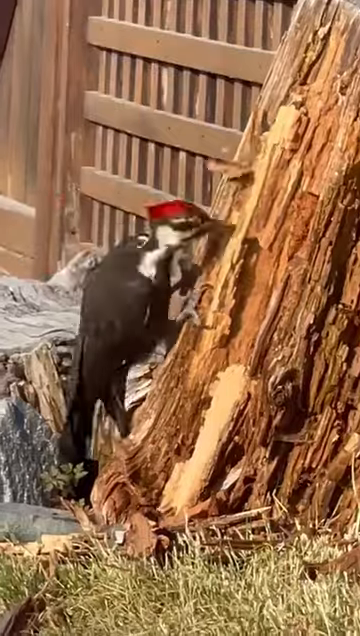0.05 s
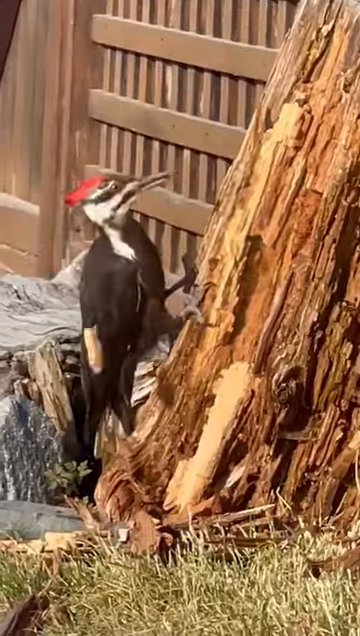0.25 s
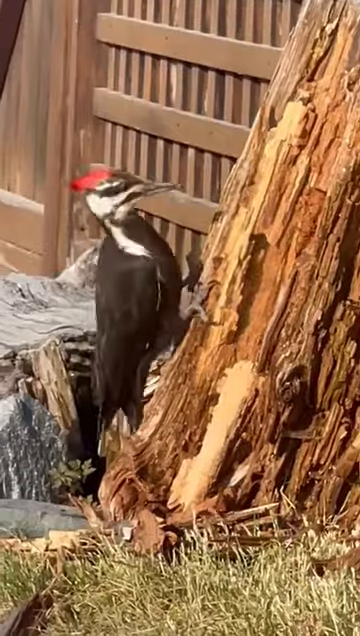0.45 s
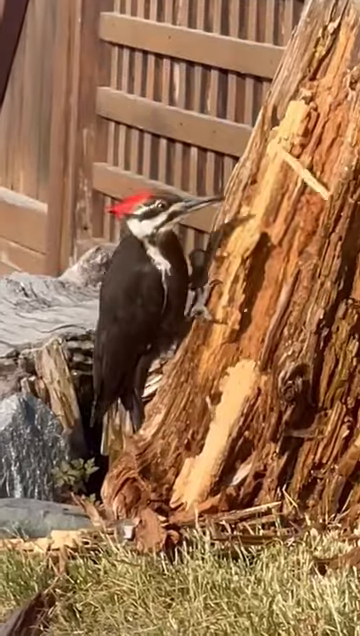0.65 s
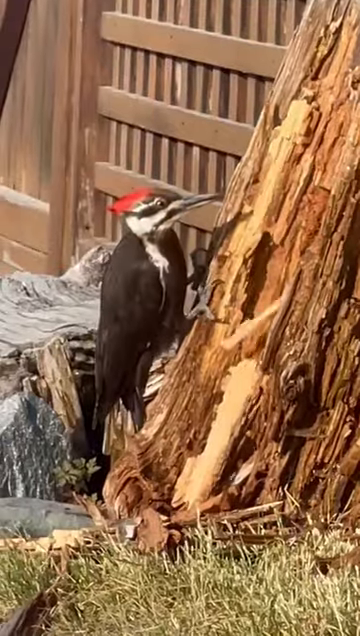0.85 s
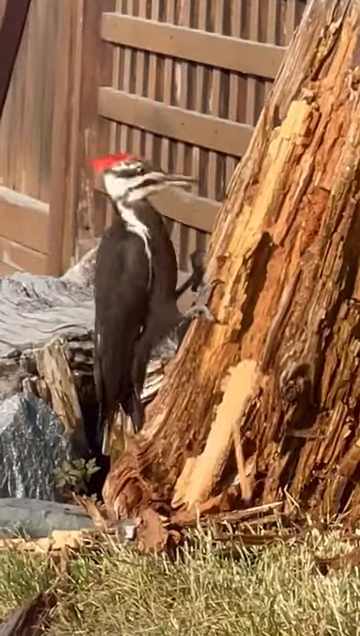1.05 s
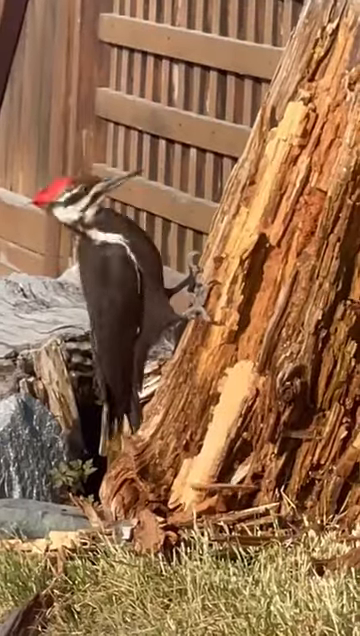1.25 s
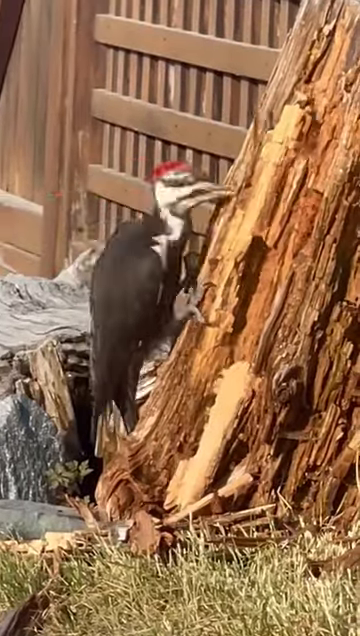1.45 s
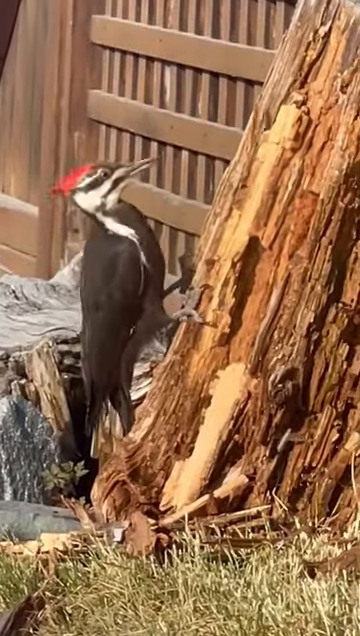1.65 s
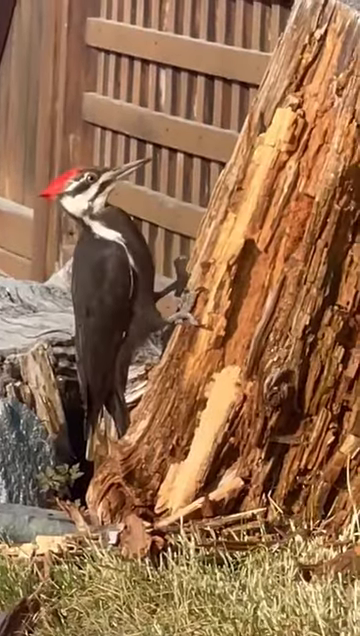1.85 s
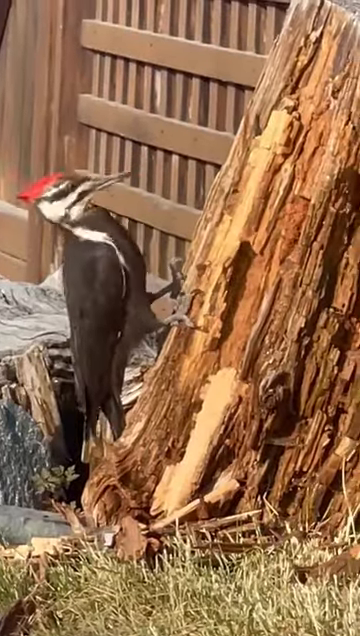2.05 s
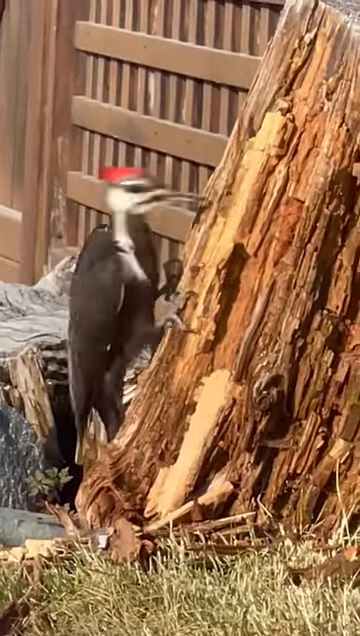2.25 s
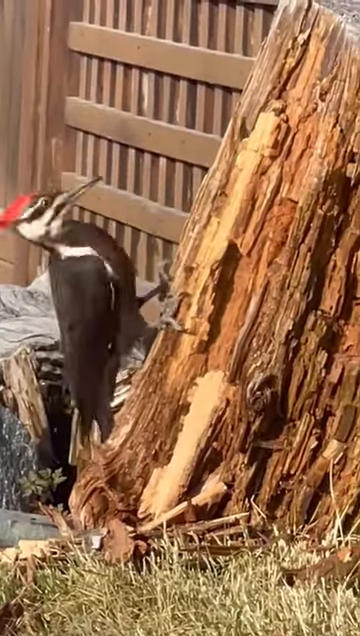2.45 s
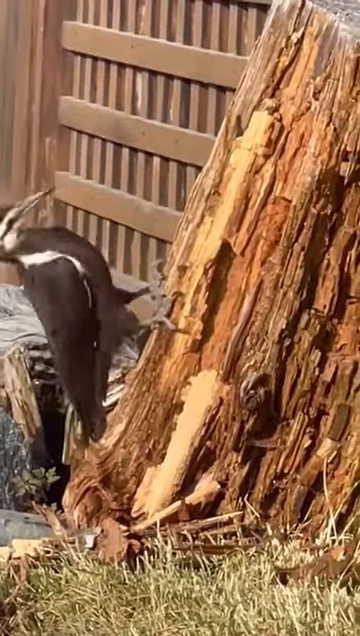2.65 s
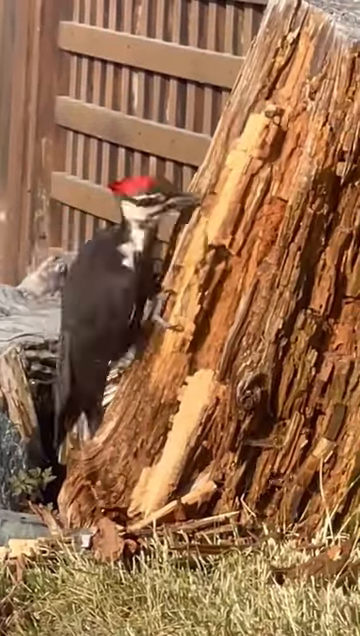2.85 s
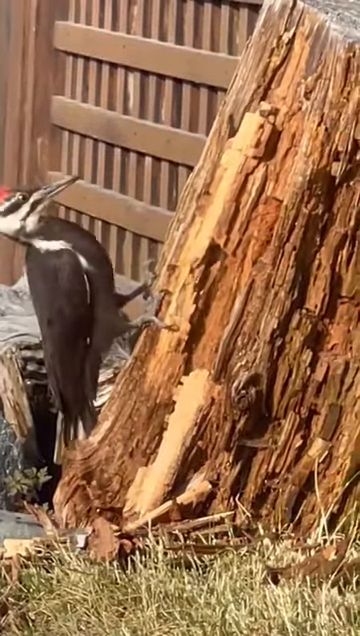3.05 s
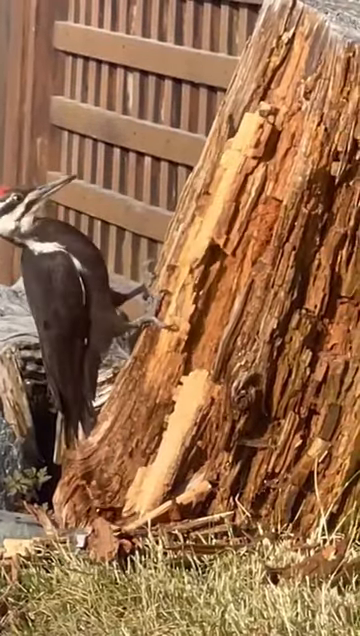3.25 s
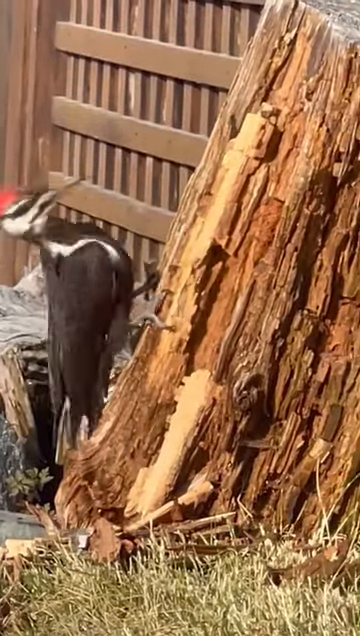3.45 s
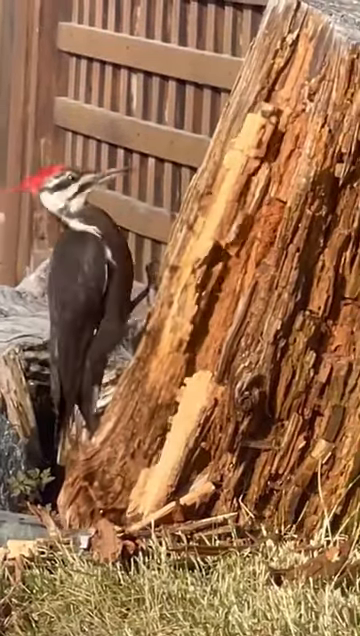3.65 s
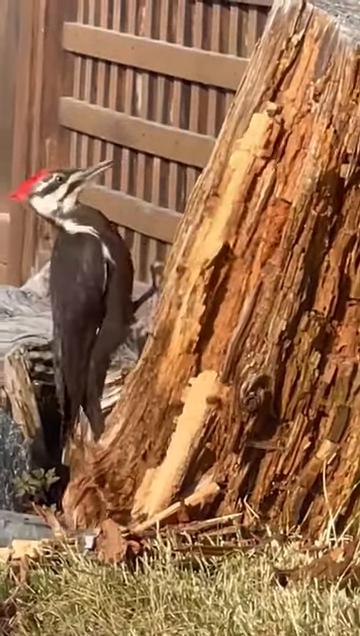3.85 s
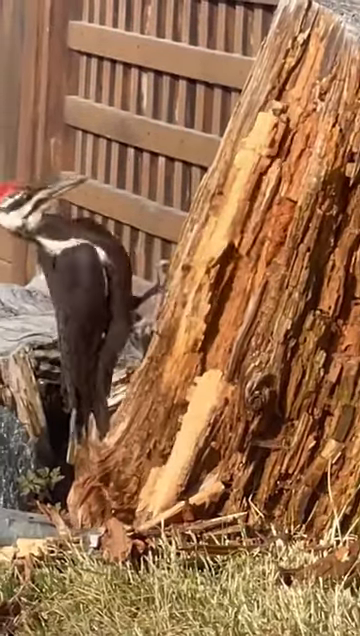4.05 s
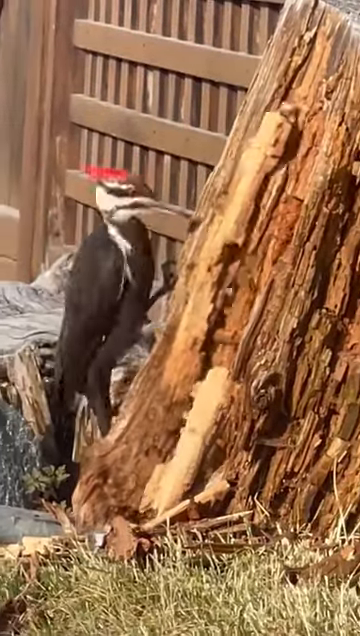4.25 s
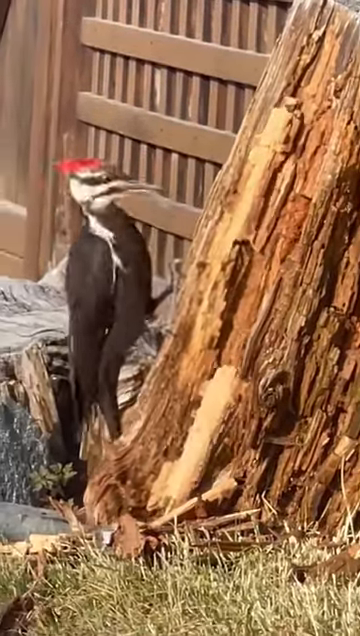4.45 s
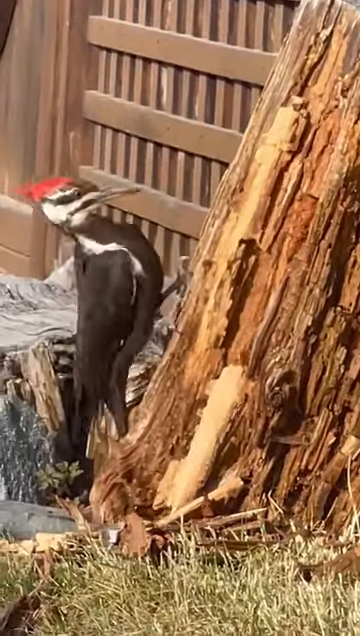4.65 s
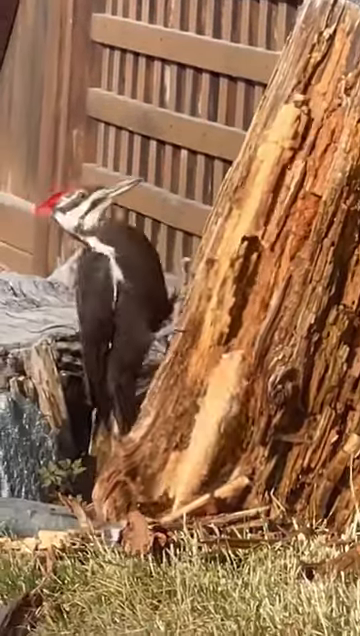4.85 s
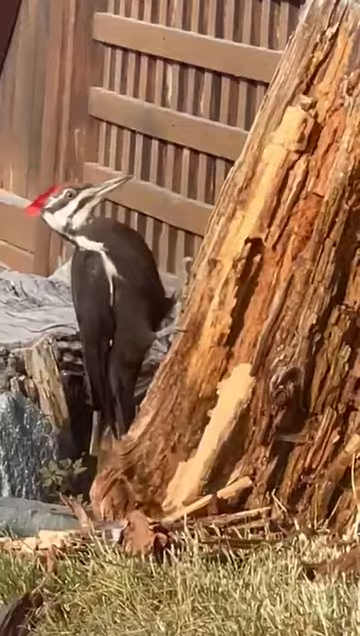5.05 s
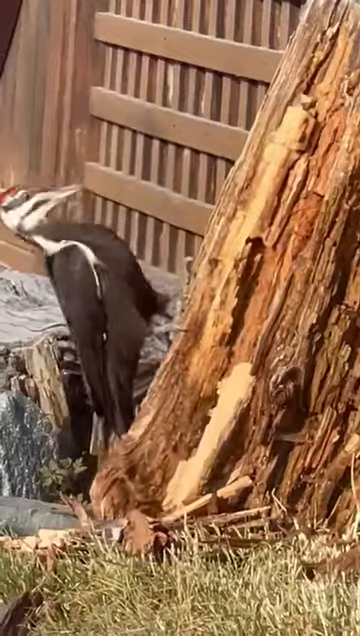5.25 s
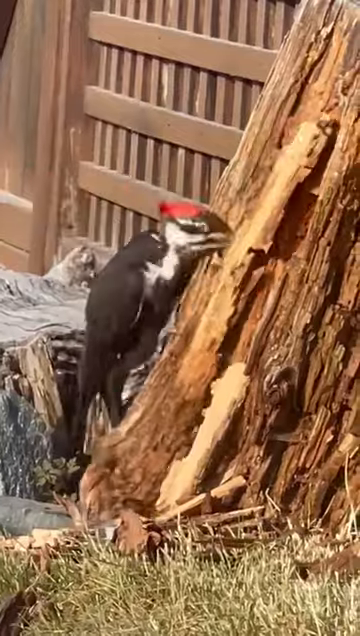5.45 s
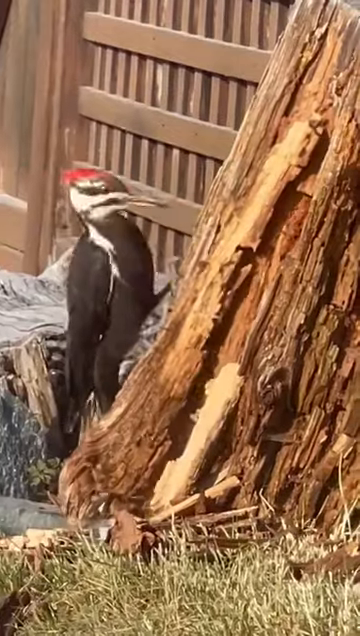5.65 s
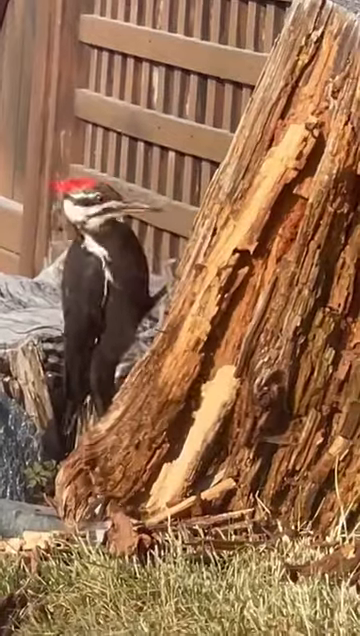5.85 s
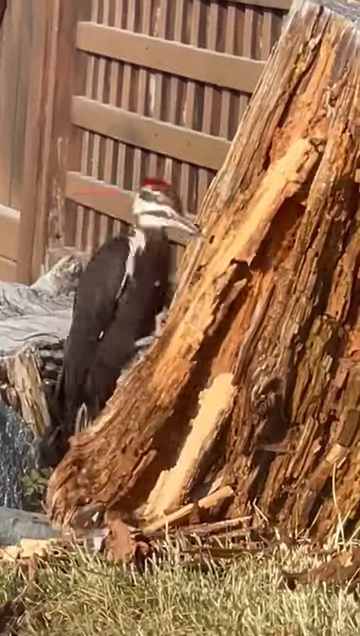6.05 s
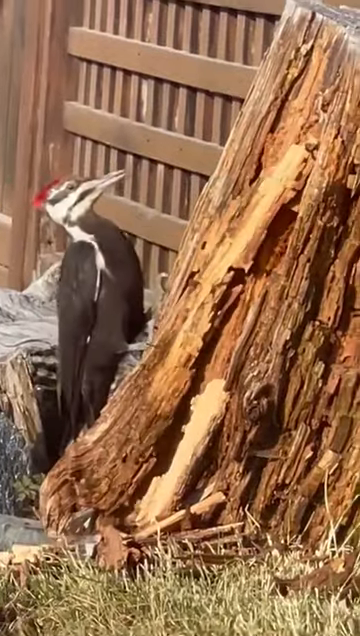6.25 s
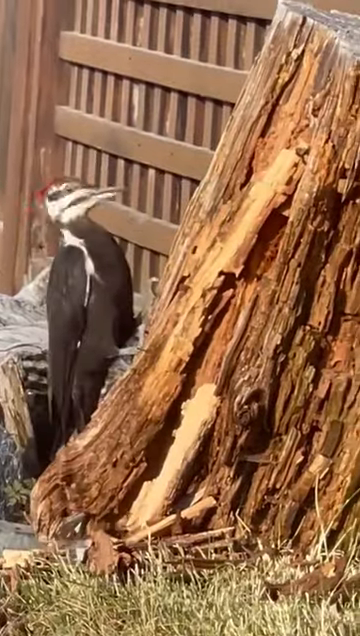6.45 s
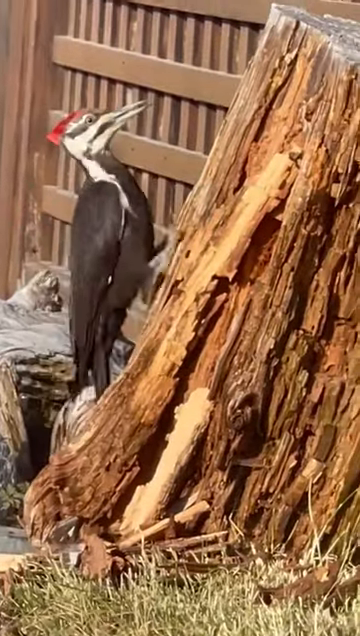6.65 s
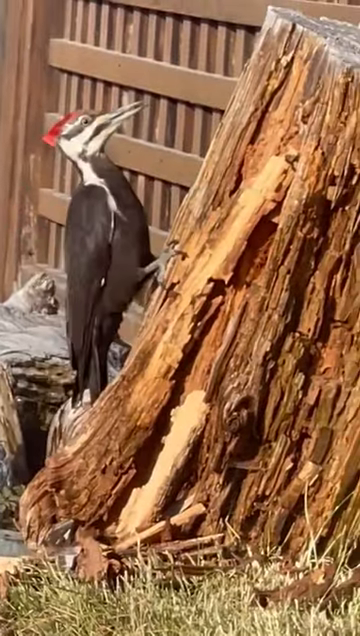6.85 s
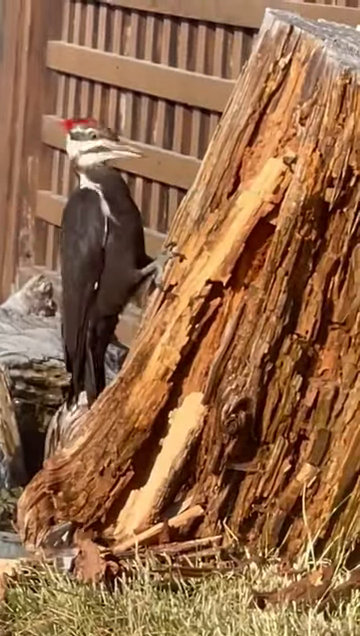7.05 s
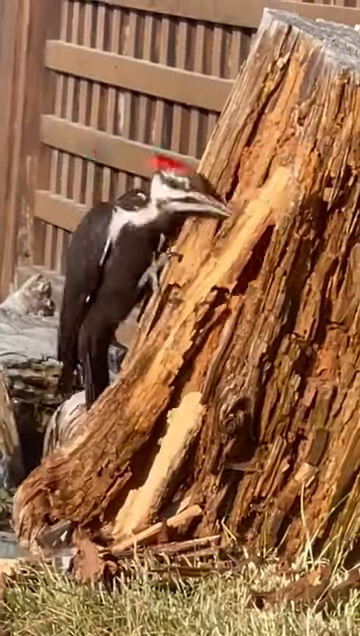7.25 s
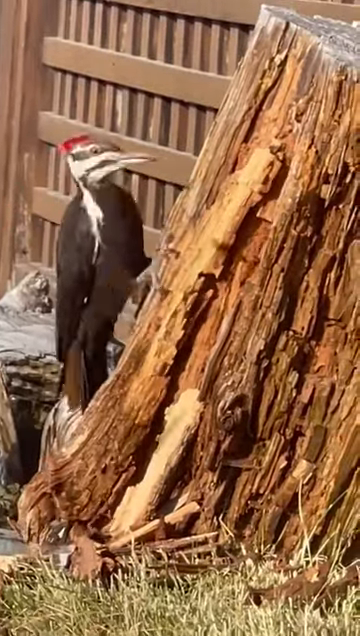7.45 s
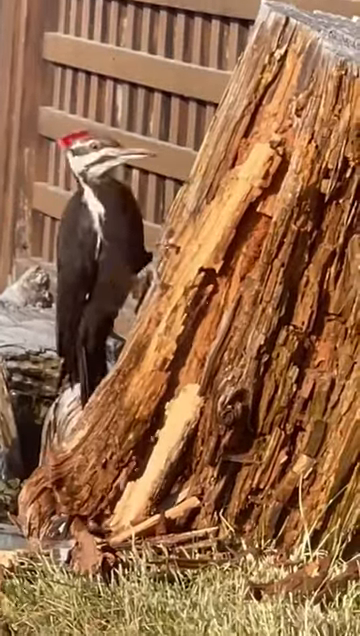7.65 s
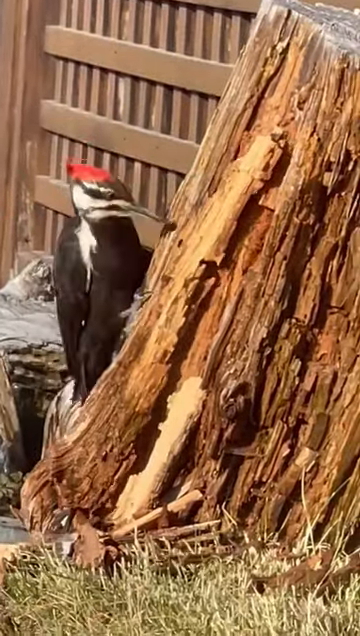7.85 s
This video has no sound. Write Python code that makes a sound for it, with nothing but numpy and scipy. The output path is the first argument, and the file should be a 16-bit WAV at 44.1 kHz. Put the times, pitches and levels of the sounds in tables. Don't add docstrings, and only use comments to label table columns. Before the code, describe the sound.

A large woodpecker chops a rotten stump with sharp, uneven single blows, hollow woody knocks, snapping splinters and falling chips in a quiet yard.

```python
import sys
import numpy as np
from scipy import signal
from scipy.fft import rfft, irfft, next_fast_len
from scipy.io import wavfile
from scipy.ndimage import uniform_filter1d

SR = 44100
rng = np.random.default_rng(int(sys.argv[2]) if len(sys.argv) > 2 else 0)


def master_out(mix):
    frames = np.transpose(np.atleast_2d(mix))
    ceiling = np.clip(frames, -1, 1)
    pcm = np.round(ceiling * 32767).astype(np.int16)
    wavfile.write(sys.argv[1], SR, pcm)


def ratio_of_db(decibels):
    return 10 ** (np.asarray(decibels, float) / 20)


N = 348831


def evened(x):
    return x / np.sqrt(np.mean(x ** 2) + 1e-20)


def read(points, hz):
    f, value = np.transpose(points)
    return np.interp(np.log(hz + 1), np.log(f + 1), value)


def shaped(x, spectrum, size):
    return irfft(rfft(x, size) * ratio_of_db(read(spectrum, np.fft.rfftfreq(size, 1 / SR))), size)


def coloured(spectrum, size):
    return evened(shaped(rng.standard_normal(size), spectrum, size))


def fade(t, rise, t60):
    return (1 - np.exp(-t / rise)) * ratio_of_db(-60 * t / t60)


def gritty(size, grain, spread_db):
    lumps = evened(uniform_filter1d(rng.standard_normal(size), grain))
    return ratio_of_db(spread_db * np.clip(lumps, -3, 2))


def add(mix, s, sound):
    part = mix[round(s * SR):][:len(sound)]
    part += sound[:len(part)]


# freq_hz, level_db
CRACK_SPECTRUM = [(300, -17), (1200, -22), (2300, -9.5), (3200, -4), (4000, 4), (6000, 2.5), (10000, 9),
                  (13000, -9.5)]


def crack(t, peak_db):
    burst = coloured(CRACK_SPECTRUM, len(t)) * fade(t, .0008, .0095)
    return ratio_of_db(peak_db) * burst / abs(burst).max()


def ring(modes, t, spread_db, cycles, scatter, factor, tilt_db):
    strands = 8
    hz, db, t60 = np.repeat(modes, strands, axis=0).T[:, :, None]
    detune, nudge, unevenness = rng.standard_normal((3, len(hz), 1))
    start = np.repeat(rng.uniform(0, 2 * np.pi, len(modes)), strands)[:, None] + .6 * nudge
    waves = np.sin(2 * np.pi * hz * factor * (1 + scatter * detune) * t + start)
    swell = (1 - np.exp(-t * hz / cycles)) ** 2 * ratio_of_db(-60 * t / t60)
    level = ratio_of_db(db + tilt_db * np.log2(hz / hz.mean()) + spread_db * unevenness)
    sound = (level * swell * waves).sum(0)
    return sound / np.sqrt(np.mean(sound[:1000] ** 2))


# pitch_hz, level_db, t60_s
BODY_MODES = [(59, -10.5, 0.3), (81.7, -14, 0.46), (111.6, -5, 0.16), (150, -7.5, 0.26), (203.9, -7, 0.26),
              (260.73, 7.5, .07), (320.8, -2, 0.074), (387.9, -5.5, 0.07)]


def hollow_body(t, level_db, factor, tilt_db):
    return ratio_of_db(level_db + 1.0) * ring(BODY_MODES, t, 2.2, 2.2, .035, factor, tilt_db)


# pitch_hz, level_db, t60_s
KNOCK_MODES = [(460.05, 2.5, 0.031), (606.5, 0.5, 0.04), (713.6, -4.5, 0.073), (1008.4, -3, 0.029),
               (1052.2, -7, 0.063), (1270, -6.5, 0.014), (1610, -4.5, .024), (1956, -8.5, 0.022),
               (2290, -7, 0.022), (2751, -16, 0.017)]


def knock(t, level_db, factor, tilt_db):
    wood = ratio_of_db(level_db - 1.5) * ring(KNOCK_MODES, t, 1, 3.2, .05, factor, tilt_db)
    return wood * gritty(len(t), 40, 3.5)


# freq_hz, level_db
TEAR_SPECTRUM = [(150, -1.5), (600, -1), (1500, -10), (3000, -8.5), (6000, -9.5), (13000, -9)]


def tearing_fibres(t, level_db):
    tear = coloured(TEAR_SPECTRUM, len(t)) * gritty(len(t), 60, 1.6) * fade(t, 0.0021, t60=0.18)
    tear *= np.exp(-(t / 0.061) ** 3)
    return ratio_of_db(level_db) * tear


def blow(crack_db, body_db, knock_db, tear_db, body_factor, body_tilt_db, knock_factor, knock_tilt_db):
    t = np.arange(16384) / SR
    bright = crack(t, crack_db)
    tear = tearing_fibres(t, tear_db)
    wood = hollow_body(t, body_db, body_factor, body_tilt_db)
    add(wood, 0, knock(t[:5000], knock_db, knock_factor, knock_tilt_db))
    return bright + wood + tear


# start_s, crack_peak_db, body_db, knock_db, tear_db
BEAK_BLOWS = [(0.1052, -11.5, -40.5, -33.5, -47.5), (0.5992, -24, -57, -54, -46),
              (1.5232, -20, -38, -41.5, -43.5), (2.356, -17, -39.5, -38, -41.5),
              (2.9088, -24.5, -38.5, -48.5, -34.5), (2.9252, -18, -54, -38.5, -52.5),
              (3.581, -26, -41, -48, -34.5), (4.2245, -28, -38.5, -46, -39.5),
              (4.7858, -22, -47.5, -48.5, -40.5), (5.5179, -27, -41.5, -48.5, -39.5),
              (6.0779, -35.5, -51.5, -57.5, -50), (6.097, -13.5, -47.5, -51, -50.5),
              (7.3448, -26, -57, -53.5, -38.5)]
LANDING_SPOTS = [(.98, .1, .97, -1), (1.002, -3.2, 1.001, 2.54), (1.04, 0.5, .97, -4.5),
                 (1.04, 0.5, 1.04, 3), (1.019, 0.5, 1.001, 1.18), (1.02, -0.7, 1.001, 2.5),
                 (1.04, 4, .99, -4.5), (1.001, 2.5, 1.001, -1), (1.001, 0, 1.001, 4.5),
                 (1.001, 2, 1.001, 1), (1.001, 1.47, 1.001, -0.41), (1.001, 0, 1.001, -1.54),
                 (1.001, 4.95, 1.05, 5.68)]


def blows(mix):
    for s, *settings in np.hstack([BEAK_BLOWS, LANDING_SPOTS]):
        add(mix, s, blow(*settings))


def tick(peak_db, hz, bright_db, wood_db, fall_db):
    t, t60 = np.arange(4096) / SR, 0.49 / max(fall_db, 3)
    shape = gritty(len(t), 30, 3.5) * fade(t, .06 * t60, t60)
    snap_spectrum = [(700, -30), (1200, -9), (hz, 0), (hz * 1.6, -8), (5000, -10), (6500, -35)]
    edge_spectrum = [(4000, -46.0), (5200, -8), (7200, -0.5), (10000, -1.5), (13000, -7.5)]
    wood_spectrum = [(200, -25), (400, 13.0), (1100, 7), (1600, -40)]
    snap = coloured(snap_spectrum, len(t)) * shape
    edge = coloured(edge_spectrum, len(t)) * shape
    woody = coloured(wood_spectrum, len(t)) * fade(t, 0.2 * t60, 1.4 * t60)
    sharp = (snap + ratio_of_db(bright_db + 6.0) * edge) / abs(snap).max()
    return ratio_of_db(peak_db) * (sharp + ratio_of_db(wood_db - 1.5) * woody)


# start_s, peak_db, ring_hz, bright_edge_db re peak
SPLINTER_SNAPS = [(0.6078, -32, 3920, 5), (0.6137, -38.5, 3740, 5.5), (0.6204, -52, 3320, -17),
                  (0.6491, -45.5, 2370, -22), (1.5314, -38.5, 3000, 0), (1.5732, -41.5, 1610, -1),
                  (1.5984, -45, 1630, -0.5), (1.6508, -49, 3010, 2), (2.3894, -43, 2300, 1.5),
                  (2.416, -43.5, 1265, 1.5), (2.4582, -49.5, 2942, -11), (2.6335, -56.5, 1800, -27.5),
                  (2.735, -67.5, 1590, -20.5), (3.7494, -65.5, 1217, 6.5), (3.7958, -51.5, 1950, -17.5),
                  (3.8244, -55, 4180, -12), (4.2354, -35, 2220, 4), (4.35, -57, 1580, -6.5),
                  (4.374, -40.5, 1540, -3.5), (4.5082, -52.5, 2400, -13.5), (4.8194, -55, 1860, 9.5),
                  (4.8552, -38, 2570, -5.5), (4.8668, -40.5, 1980, -11), (5.6592, -52, 2060, 0),
                  (6.1114, -34, 2755, -22.5), (7.3538, -35.5, 1896, -6.5), (7.3892, -53.5, 1900, 6),
                  (7.8600, -52, 3000, -3.5), (7.8743, -49.5, 2250, 2.5)]


def splinters(mix):
    for s, peak_db, hz, bright_db in SPLINTER_SNAPS:
        add(mix, s, tick(peak_db, hz, bright_db, wood_db=-6, fall_db=21))


# start_s, peak_db, ring_hz, bright_edge_db re peak
CHIP_SKIDS = [(0.4424, -56.5, 1690, -6), (0.6943, -57, 1650, -24.5), (0.8692, -56.5, 3350, -1.5),
              (2.087, -60.5, 1480, -2), (3.6782, -45, 1455, -3), (4.271, -42, 1990, 0),
              (4.433, -52.5, 3550, -22), (4.6124, -51.5, 1670, -46.5), (4.9326, -48.5, 1890, -2.5),
              (5.5834, -48.5, 2350, -4.5), (5.6401, -50, 2029, -1), (6.7052, -51, 1970, -14),
              (6.7534, -50, 2400, 1), (6.7631, -50, 1650, -0.4), (6.7962, -49.5, 2210, -8),
              (7.2472, -50.5, 2200, -6), (7.4784, -65.5, 1890, -0.25), (7.5633, -65.5, 1500, -12.5),
              (7.668, -65, 3470, -0.5), (0.7235, -69, 2576, -20.5), (0.884, -62, 3240, -17.5),
              (1.556, -49, 3675, -12), (3.6699, -53.5, 2000, -5.5), (3.9343, -67.5, 1794, 0.5),
              (4.4023, -56, 3220, -14), (4.7405, -55.5, 3020, -20.5), (5.7277, -62, 2927, -15.5),
              (6.384, -66, 1500, -31), (7.903, -52.5, 2800, -6)]


def chips(mix):
    for s, peak_db, hz, bright_db in CHIP_SKIDS:
        add(mix, s, tick(peak_db, hz, bright_db, wood_db=-8.5, fall_db=11))


# start_s, peak_db
CLAW_SCRATCHES = [(0.003, -73), (0.4164, -64), (0.4637, -71), (0.4964, -74.5), (0.969, -76), (1.0008, -70),
                  (2.553, -79), (4.1494, -72), (6.0965, -41), (6.696, -76), (6.742, -72), (7.117, -74),
                  (7.4126, -58), (7.6534, -70.5), (7.7914, -65), (7.8131, -67)]


def claws(mix):
    for s, peak_db in CLAW_SCRATCHES:
        add(mix, s, tick(peak_db, hz=2200, bright_db=12.5, wood_db=0.5, fall_db=37))


# start_s, peak_db
CRUMB_DROPS = [(1.0434, -67.5), (4.72, -72), (5.017, -66), (5.046, -65), (5.07, -67), (5.7513, -69),
               (5.8683, -71), (6.0591, -62), (6.2344, -65.5), (7.104, -72)]


def crumbs(mix):
    for s, peak_db in CRUMB_DROPS:
        add(mix, s, tick(peak_db, hz=1797, bright_db=-2.5, wood_db=17.5, fall_db=18))


def thud(peak_db, hz, t60):
    t = np.arange(4096) / SR
    start = 9 * ratio_of_db(0.61 * (peak_db + 28))
    turns = np.cumsum(hz * (1 + start * np.exp(-t / 0.003))) / SR
    sound = np.sin(2 * np.pi * turns) * fade(t, 0.0017, t60) * np.exp(-(t / 0.026) ** 4)
    return ratio_of_db(peak_db) * sound / abs(sound).max()


# start_s, peak_db, final_pitch_hz, t60_s
SLAB_THUDS = [
    (4.9145, -32, 105.8, 0.297),
    (5.427, -50, 104, 0.184),
    (5.614, -38, 107.6, 0.235),
    (5.868, -44.5, 110.5, 0.27),
    (6.66, -53.5, 99.95, 0.215),
]


def slabs(mix):
    for s, *fall in SLAB_THUDS:
        add(mix, s, thud(*fall))


def sweep(length, hz, db):
    size = round(length * SR)
    spectrum = [(hz * .12, -70), (hz * 0.34, -28), (hz, 0), (hz * 1.5, -28), (hz * 6, -75)]
    return ratio_of_db(db) * coloured(spectrum, size) * np.hanning(size) * gritty(size, 300, 1.3)


# start_s, length_s, centre_hz, level_db
SOFT_SWEEPS = [(1.23, 0.263, 1690, -75.5), (1.35, 0.198, 3370, -81), (1.80, 0.087, 1950, -76.5),
               (2.05, 0.0875, 390, -65.5), (2.56, 0.172, 2690, -85.5), (2.59, 0.117, 326, -74.5),
               (4.41, 0.218, 4980, -79.5), (4.901, 0.0231, 743, -46.5), (4.96, 0.572, 114.8, -56.5),
               (5.02, 0.295, 578, -65.5), (5.05, 0.11, 1720, -70.5), (5.28, 0.068, 2275, -79.5),
               (5.845, 0.041, 1715, -68.5), (6.52, 0.1026, 1960, -72.5), (7.09, 0.244, 1110, -74.5),
               (7.19, 0.39, 131, -63.5), (7.324, 0.008, 2400, -64.5), (0.094, 0.0167, 1077, -60.5),
               (5.02, 0.291, 219.8, -61), (0.815, 0.032, 3850, -83.5), (5.09, 0.133, 1586, -75.5),
               (6.38, 0.077, 1420, -77)]


def sweeps(mix):
    for s, *puff in SOFT_SWEEPS:
        add(mix, s, sweep(*puff))


def note(rows, upper_db=-60):
    s, *columns = np.transpose(rows)
    t = np.arange(s[0], s[-1], 1 / SR)
    hz, db, *lower_db = (np.interp(t, s, c) for c in columns)
    waver = evened(uniform_filter1d(rng.standard_normal(len(t)), 500))
    angle = 2 * np.pi * np.cumsum(hz * (1 + 0.0027 * waver)) / SR
    lower = sum(ratio_of_db(low) * np.sin(angle / 2) for low in lower_db)
    sides = lower + ratio_of_db(upper_db) * np.sin(angle + angle / 2)
    voice = ratio_of_db(1.7 * waver) * np.sin(angle) + sides
    return s[0], np.sqrt(2) * ratio_of_db(db) * voice * signal.windows.tukey(len(t), .04)


# time_s, main_pitch_hz, level_db, lower_partial_db re main
NASAL_CRIES = [
    [(4.595, 1833, -66, -19), (4.66, 1809, -73.5, -2.5), (4.73, 1763, -75.5, -1), (4.79, 1843, -66, -22),
     (4.9, 1866, -67.5, -25.5), (4.915, 1870, -84, -20.5), (4.96, 1888, -60.5, -28),
     (5.025, 1857, -70, -24), (5.07, 1522, -71, -14.5)],
    [(6.225, 1827, -70.5, -20.5), (6.3, 1832, -71, -19.5), (6.36, 1860, -68.5, -10),
     (6.48, 1855, -68.5, -8.5), (6.51, 1814, -68, -11.5), (6.53, 1670, -73, -4),
     (6.545, 1835, -70.5, -18.5), (6.57, 1804, -82, -19)],
    [(7.255, 1857, -71.5, -25), (7.4, 1845, -68, -17), (7.47, 1865, -69.5, -5.5), (7.487, 1864, -76, -8),
     (7.51, 1889, -66, -9), (7.585, 1946, -64, -2), (7.63, 1978, -76, -23.5), (7.69, 1968, -70, -6),
     (7.72, 1960, -75, -10.5), (7.76, 1946, -61, -7), (7.81, 1960, -75, -14.5), (7.86, 1975, -66, -25.5),
     (7.91, 1973, -69, -25.5)],
]
CRY_UPPER_DB = (-28, -19, -32)


def cries(mix):
    for rows, upper_db in zip(NASAL_CRIES, CRY_UPPER_DB):
        add(mix, *note(rows, upper_db))


# time_s, pitch_hz, level_db
WHISTLES = [
    [(.26, 2620, -95), (.33, 2550, -90), (.45, 2450, -94)],
    [(2.5, 1380, -90), (2.55, 1400, -85), (2.62, 1430, -90)],
    [(2.65, 1330, -87), (2.7, 1140, -83)],
    [(2.56, 2790, -93), (2.62, 2830, -91)],
    [(3.01, 2630, -82), (3.06, 2690, -80), (3.09, 2620, -82), (3.12, 2480, -86)],
    [(3.08, 1320, -89), (3.13, 1120, -86)],
    [(3.18, 2480, -92), (3.24, 2440, -89)],
    [(3.29, 2380, -90), (3.32, 2300, -88), (3.335, 2050, -89)],
    [(3.33, 1150, -89), (3.42, 1240, -88)],
    [(3.41, 2520, -86), (3.45, 2620, -87), (3.49, 2670, -86), (3.545, 2550, -88)],
]


def peeps(mix):
    for rows in WHISTLES:
        add(mix, *note(rows))


# freq_hz, likeness_0_to_1
PORT_LIKENESS = [(60, 1.0), (130, .97), (270, .8), (580, .2), (1100, .25), (1700, .7), (2300, .98),
                 (12000, .995)]


def two_ports(left, other, hz, power):
    same = np.clip(read(PORT_LIKENESS, hz), -1, 1)[:, None] ** power
    return np.array([left, same * left + np.sqrt(1 - same ** 2) * other])


# freq_hz, t60_s
ECHO_T60 = [(100, 0.37), (260, 0.3), (700, 0.27), (1840, 0.24), (4850, .2), (11000, 0.18)]


def yard(x):
    taps = np.zeros((2, 22000))
    at = np.arange(300, 21980, 20) + rng.integers(0, 20, (2, 1084))
    np.put_along_axis(taps, at, rng.choice([-1., 1.], at.shape), 1)
    hz, t, z = signal.stft(taps, SR, nperseg=256)
    z = two_ports(z[0], z[1], hz, power=0.5)
    tail = signal.istft(z * ratio_of_db(-60 * t / read(ECHO_T60, hz)[:, None]), SR, nperseg=256)[1]
    echoes = signal.fftconvolve(x[None], tail / np.linalg.norm(tail[0]), axes=1)[:, :N]
    return echoes * gritty(N, 90, 3.5)


# time_s, above_calm_db
BIRD_STIR = [(0, 0.5), (.35, 3), (1.1, 1.5), (1.6, 3.5), (2.7, -1.5), (3.74, 5), (4.05, 0.5), (4.36, 11.5),
             (4.56, 1), (5.05, 14.5), (5.3, 0), (5.5, 0), (5.7, 8), (6.0, 4), (6.3, 7), (7.0, 2),
             (7.35, 11), (7.91, -2.5)]
# centre_s, spread_s, swish_db, hiss_db
DEBRIS_SHOWERS = [
    (0.012, .11, -73, -82),
    (2.47, .1, -82, -79),
    (3.75, .16, -73, -78),
    (4.42, .26, -69, -72),
    (4.62, .16, -76, -80),
    (4.86, .13, -70, -77),
    (5.12, .2, -72, -78),
    (5.6, .09, -70, -73),
    (7.86, .1, -69, -72),
]


def levels():
    t = np.arange(N) / SR
    calm_db, follow = (-67, -77, -87, -86), (.45, 0.976, .8, .15)
    stir_db = np.interp(t, *np.transpose(BIRD_STIR))
    power = ratio_of_db(np.outer(follow, stir_db) + np.transpose([calm_db])) ** 2
    for s, spread, *db in DEBRIS_SHOWERS:
        power[2:] += np.outer(ratio_of_db(db) ** 2, np.exp(-4 * ((t - s) / spread) ** 2))
    return np.sqrt(power)


# freq_hz, level_db
RUMBLE_SPECTRUM = [(15, -63.5), (30, -15.5), (45, 0), (60, 5.5), (95, -1.5), (150, -5.5), (250, -26.5),
                   (400, -52)]
# freq_hz, level_db
RUSTLE_SPECTRUM = [(120, -25.5), (200, -5), (300, -1), (600, -7.5), (1000, -8), (1500, -35), (2500, -48)]
# freq_hz, level_db
SWISH_SPECTRUM = [(700, -62.5), (1200, -2.5), (1700, -3), (2600, -8.5), (4000, -14.5), (5000, -20),
                  (6500, -45)]
# freq_hz, level_db
HISS_SPECTRUM = [(3000, -45), (4800, -2), (6500, -2), (8600, 6), (13000, -15)]


def air():
    frames, hz = N // 128 + 5, np.fft.rfftfreq(512, 1 / SR)
    a, b, c, d, patches = rng.standard_normal((frames, 257, 5)).T
    patches = evened(uniform_filter1d(uniform_filter1d(patches, 9, 0), 12, 1))
    flicker = np.clip(evened(uniform_filter1d(rng.standard_normal(frames), 3)), -2.5, 1.6)
    z = two_ports(a + 1j * b, c + 1j * d, hz, power=1)
    # spectrum, patchy_db, flicker_db
    layers = ((RUMBLE_SPECTRUM, 0.1, 0.1), (RUSTLE_SPECTRUM, 2.2, .8),
              (SWISH_SPECTRUM, 3.0, 2.2), (HISS_SPECTRUM, 4.0, 3.0))
    out, size = np.zeros((2, N)), next_fast_len(N)
    for (spectrum, patchy_db, flicker_db), level in zip(layers, levels()):
        texture = z * ratio_of_db(patchy_db * patches + flicker_db * flicker)
        layer = signal.istft(texture, nperseg=512, noverlap=384)[1][:, :N]
        out += evened(shaped(layer, spectrum, size)[:, :N]) * level
    return out


def scene():
    near, far = np.zeros((2, N))
    for source in (blows, splinters, chips, claws, crumbs, slabs, sweeps):
        source(near)
    for source in (cries, peeps):
        source(far)
    return near + far + yard(ratio_of_db(-15) * near + far / 3) + air()


# freq_hz, lead_radians
PORT_LEAD = [(0, 0), (450, 0), (1000, .45), (1300, .1), (2000, .1), (2600, .45), (4000, .55), (4850, 3.1),
             (5500, 6.2), (6500, 6.45), (7300, 8.2), (7800, 9.1), (8600, 9.3), (9500, 9.5), (11000, 11.3),
             (11700, 12.4), (12500, 12.5)]
# freq_hz, difference_db
PORT_LEAN = [(60, 0), (190, 0), (260, -1), (420, -5), (800, -3), (1250, -1), (1600, 0), (12000, 0)]
# freq_hz, level_db
MIC_COLOUR = [(4000, 0), (5800, 0), (7200, -6), (8000, -2), (9200, -2), (10300, 5), (11200, 0),
              (11700, -12), (12400, -38)]


def microphones(dry):
    hz = np.fft.rfftfreq(1024, 1 / SR)
    lead = np.interp(hz, *np.transpose(PORT_LEAD))
    half = ratio_of_db(read(PORT_LEAN, hz) / 2) * np.exp(.5j * lead)
    response = irfft(np.array([half, 1 / half]) * ratio_of_db(read(MIC_COLOUR, hz)))
    taps = np.roll(response, 100, axis=1)[:, :201]
    return signal.oaconvolve(dry, taps * np.hanning(201), "same", axes=1)


def top_cut(x):
    return signal.sosfilt(signal.butter(12, 12440, fs=SR, output="sos"), x)


def record(dry):
    ports = microphones(dry)
    return top_cut(ports)


dry = scene()
out = record(dry)
master_out(out)
```